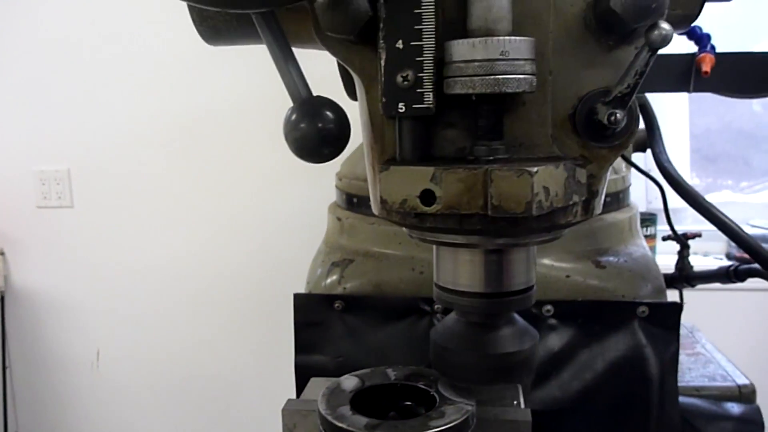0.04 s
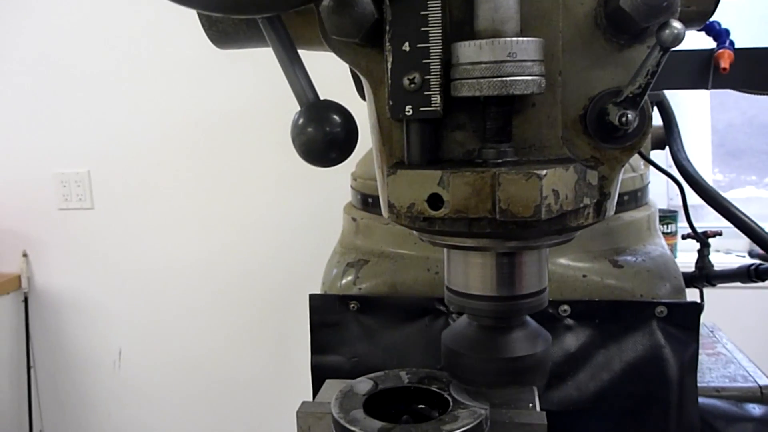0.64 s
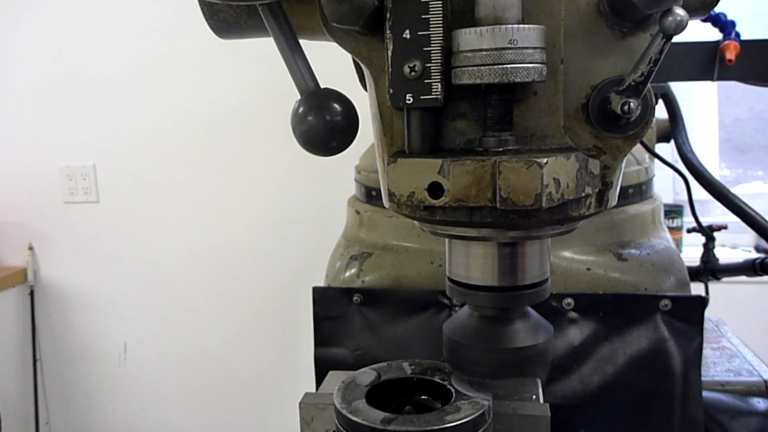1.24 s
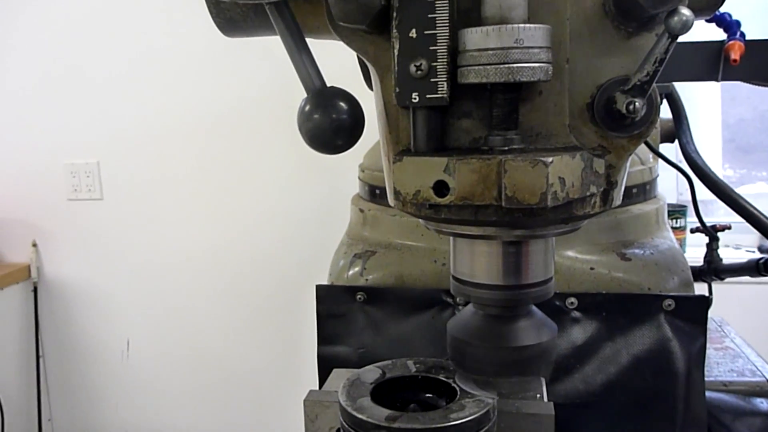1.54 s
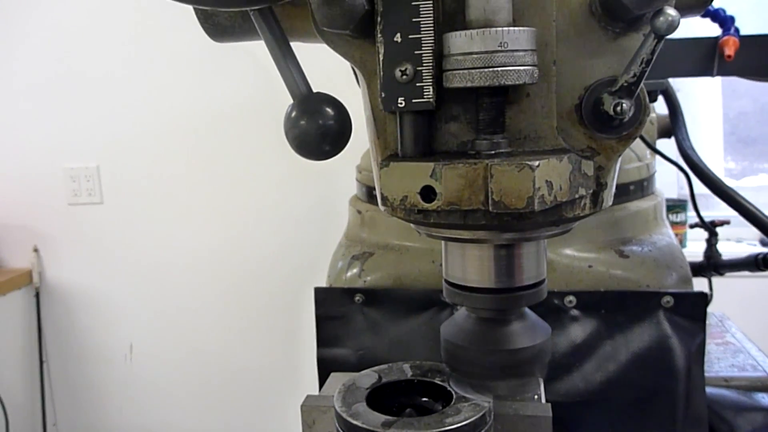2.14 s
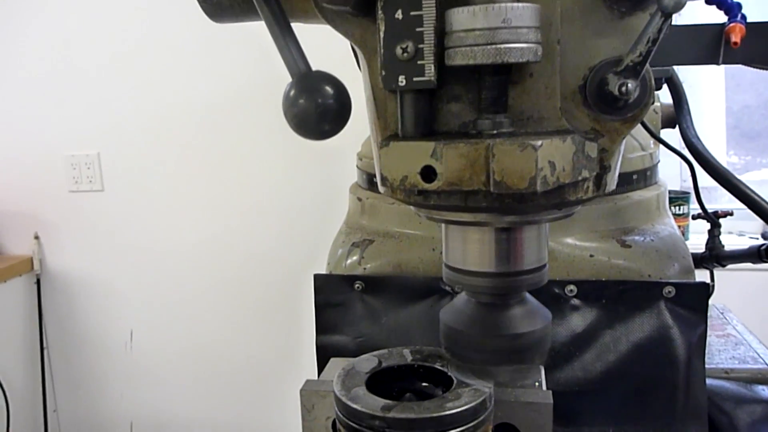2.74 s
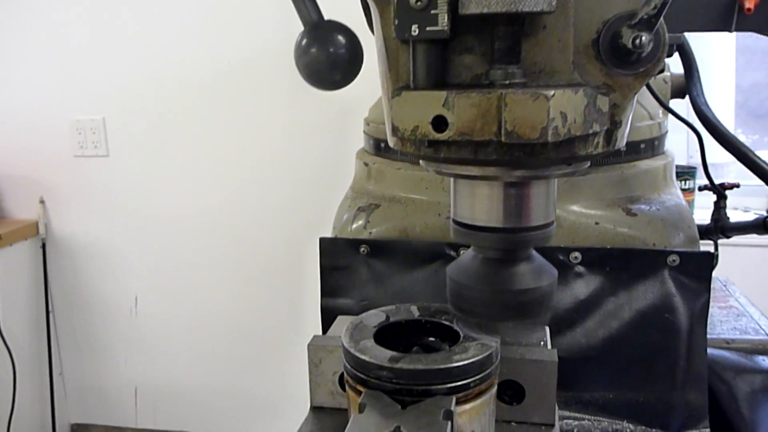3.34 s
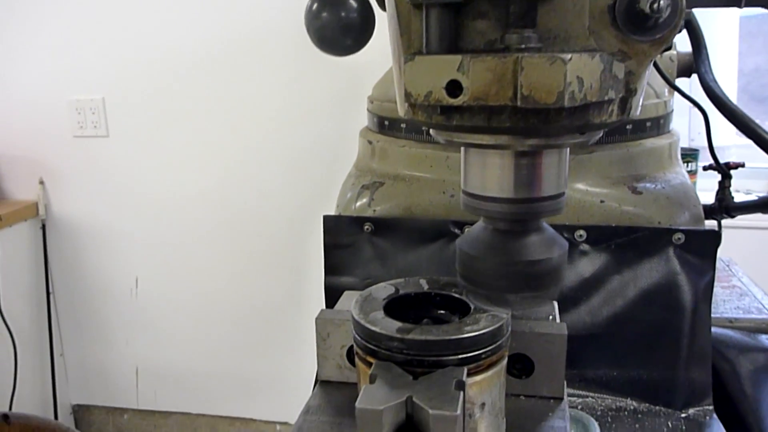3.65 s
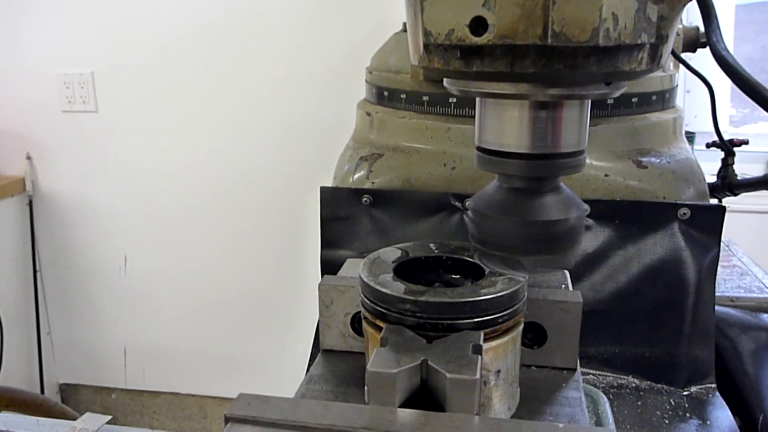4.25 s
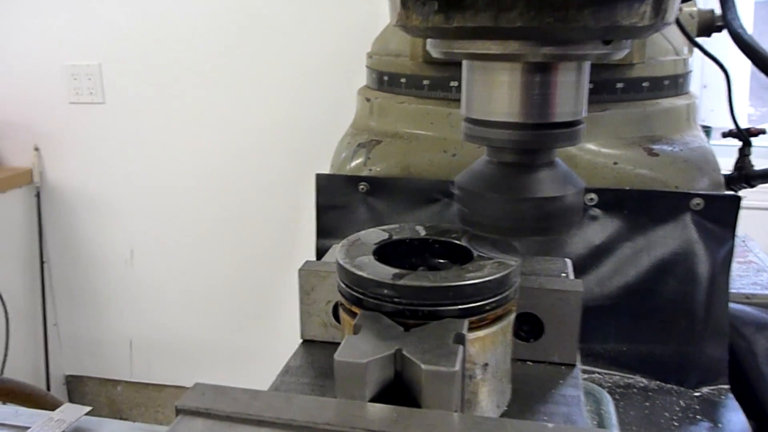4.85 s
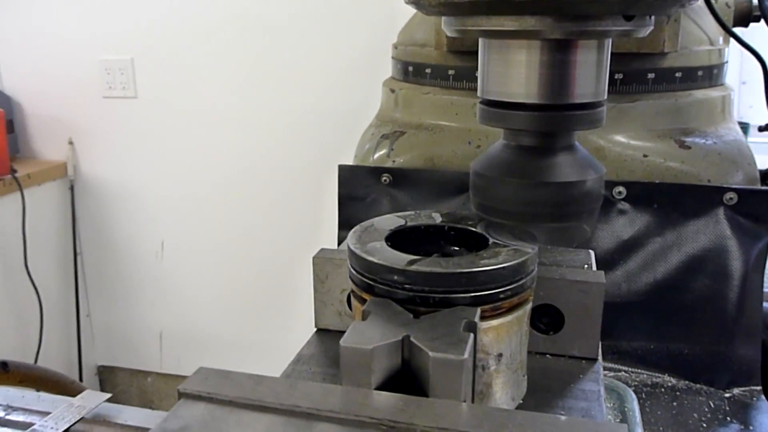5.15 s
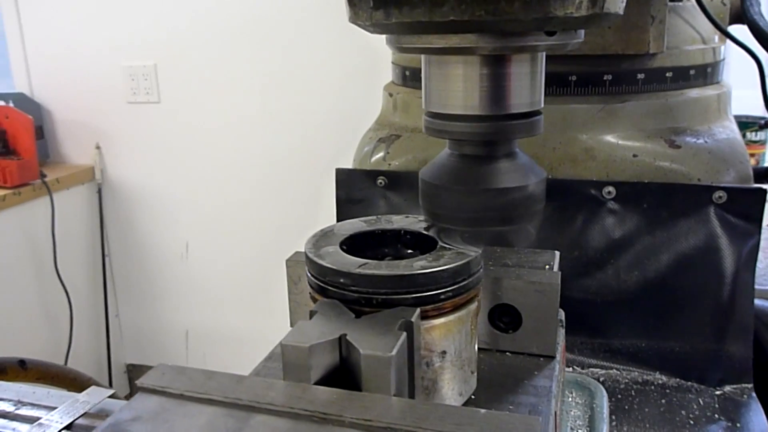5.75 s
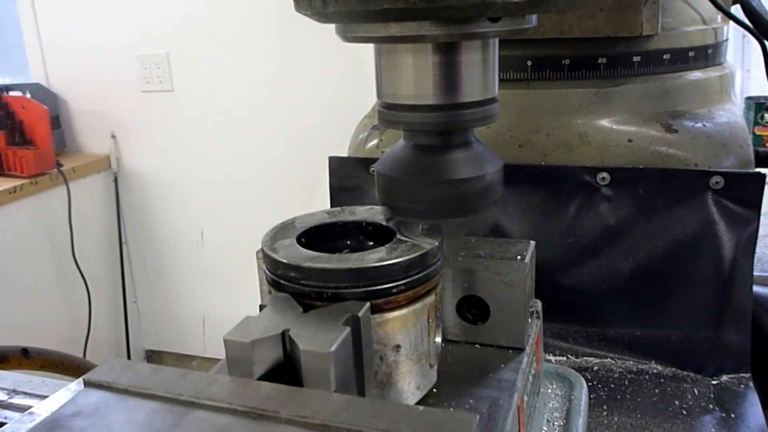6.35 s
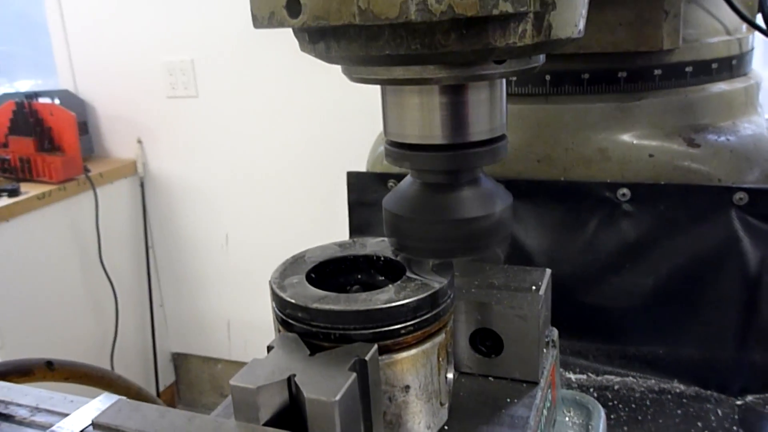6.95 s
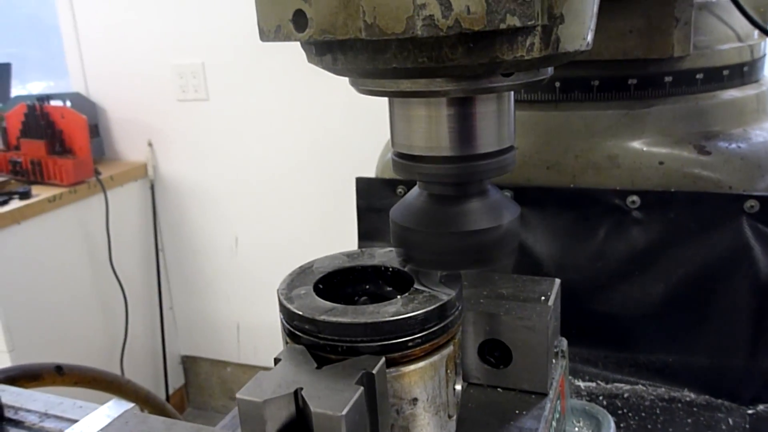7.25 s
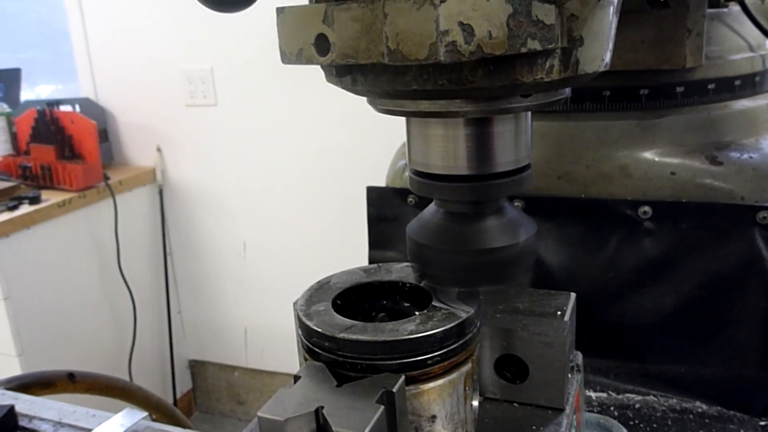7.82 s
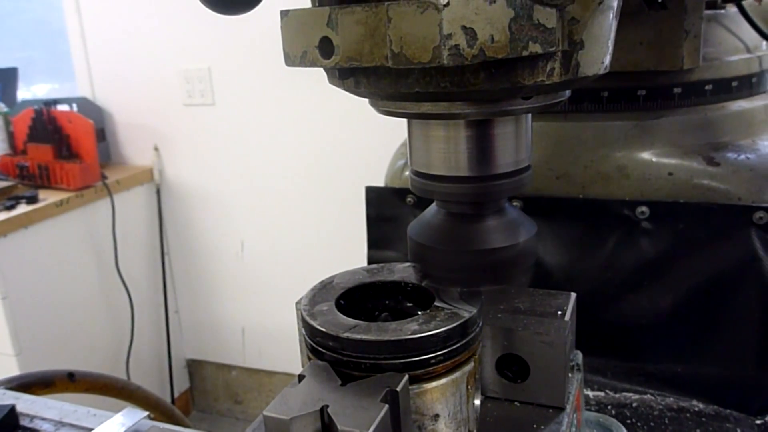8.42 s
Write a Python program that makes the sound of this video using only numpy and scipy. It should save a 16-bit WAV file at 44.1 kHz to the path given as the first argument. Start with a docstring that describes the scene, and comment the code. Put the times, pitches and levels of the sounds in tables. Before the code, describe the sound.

Steady gear drone and fast rattling as a milling cutter scrapes metal in a small workshop, with a thin whine and a few sharp clicks.

```python
"""A small workshop, where a vertical milling machine runs a face mill over a piston.
The head's gears drone, sing and clatter in a pattern that comes round with the spindle. Once a turn
the cutter bites and tears off a chip, over a steady scrape and hiss. The motor's inverter whines near
4 kHz, and a few sharp metal clicks ring out early on. The balance shifts as a hand-held microphone
sinks from the head to the cutter."""
import sys
import numpy as np
from scipy import signal
from scipy.fft import rfft, irfft, next_fast_len
from scipy.io import wavfile
from scipy.ndimage import uniform_filter1d, minimum_filter1d, map_coordinates

SR = 44100
rng = np.random.default_rng(int(sys.argv[2]) if len(sys.argv) > 2 else 0)


def store_pcm(level_fs):
    """Save levels as 16-bit WAV."""
    pcm = np.round(np.clip(level_fs, -1, 1) * 32767).astype(np.int16)
    wavfile.write(sys.argv[1], SR, np.atleast_2d(pcm).T)


N = 382788

SPINDLE_HZ, CARRIER_HZ, SUPPLY_HZ = 27.68, 3999, 50.85
SINK_START_S, SINK_END_S = 2.25, 5.7  # the microphone moves from head to cutter
FADES_PER_S = 2.95  # tones swell and fade as it drifts through the room's standing waves
TIGHT_SPOT_TURNS, THUMP_HZ, THUMP_S = .25, 555, .0045  # the teeth bind hardest at this angle

# Reverberation of the room: frequency_hz, t60_s
ROOM_DECAY = [(200, 0.27), (2000, 0.21), (6000, 0.59), (12000, 0.15)]
# Contacts on a steel part and on a duller, heavier one: start_s, level_db, ring_gain_db, t60_ratio
STEEL_HITS = [(.1117, -10.5, 2, 1.07), (.4432, -17.5, 2.5, 0.93), (.4495, -25, 6, 1.1)]
DULL_HITS = [(.016, -25, -15, 0.5), (.089, -23, -13.5, 0.5), (1.9746, -14, 2, 1), (1.988, -23, -10, 1)]
# Modes of those two parts: pitch_hz, level_db, t60_s
STEEL_MODES = [(2107, -6.5, 0.032), (2170, -19, 0.23), (2690, -12, 0.021), (2940, -10, 0.027),
               (3290, -3.5, 0.033), (4560, -2.5, 0.028), (4680, -3.5, 0.03), (4603, -33, 0.75),
               (5080, -29, .12), (5940, -14.5, 0.06), (6160, -18, 0.11), (9560, -38, 0.45),
               (9650, -23, 0.08), (11660, -36, .25)]
DULL_MODES = [(1016, -24, 0.3), (1180, -26, 0.3), (1400, -13, 0.025), (2130, -17, 0.65), (2480, -10, 0.028),
              (2720, -7, 0.028), (3150, -16, 0.025), (5400, -16, 0.033), (6160, -10, 0.04)]
# Spectral envelopes of the noises: frequency_hz, relative_density_db
CRACK_SPECTRUM = [(60, -48), (150, -30), (400, -12), (800, 5.5), (2000, 4.5), (3200, 8.5), (5000, -13),
                  (6500, -3), (8000, -26.5), (10700, -23), (15000, -54)]
DRONE_SPECTRUM = [(25, -45), (70, -52), (110, -28), (150, -23), (205, -4.5), (270, -8), (330, -5.5),
                  (400, 2), (470, -2.5), (560, 4.5), (800, -39)]
CLATTER_SPECTRUM = [(300, -44), (440, -17), (520, -5.5), (630, -2), (710, -2.5), (860, -0.5), (1030, -1.5),
                    (1250, -1), (1450, 0), (1720, -3), (1850, -7), (2300, -5.5), (3200, -13), (5000, -54)]
SCRAPE_SPECTRUM = [(500, -53), (1500, 0.5), (1900, 3.5), (2150, -4), (2400, 0), (2630, 4.5), (2820, 3),
                   (2930, 7), (3150, -5.5), (3400, -2.5), (3630, -0.5), (4000, -9), (4400, -24),
                   (6000, -67.5)]
HISS_SPECTRUM = [(1500, -37), (3500, 1), (4250, 0), (4550, 1.5), (5000, 2.5), (6300, 0), (7000, -4.5),
                 (7500, -14.5), (7900, -31), (8400, -20.5), (9600, -19.5), (10700, -10.5), (12000, -20.5),
                 (13500, -24.5), (15000, -58)]
# Resonances of housing, dragging edge, tearing chip and cutter: pitch_hz, width_hz, relative_db
HOUSING_MODES = [(498, 28, -4.5), (632, 47, -1), (788, 54, -1.5), (877, 94, 0.5)]
RASP_MODES = [(3620, 58, -1.5), (3716, 63, -2), (3970, 110, -3)]
CHIP_MODES = [(1390, 130, -4.5), (1593, 95, -0.5), (1725, 62, -1.5), (1895, 67, -2.5)]
CUTTER_MODES = [(2365, 72, -9), (2608, 59, 7), (2932, 43, -1), (3740, 290, -8)]
# Strong outer sidebands of the inverter: time_s, lower_db, upper_db
SIDEBAND_LEVELS = [(0.5, -42.5, -51), (1.8, -39, -49), (2.45, -39.5, -49), (3.05, -38.5, -51),
                   (3.65, -44.5, -46.5), (4.5, -41.5, -48.5), (5.6, -43, -51), (6.2, -41, -39),
                   (6.9, -41.5, -41), (7.7, -44, -40.5), (8.68, -42.5, -44.5)]
# Gear tones, on the nearest whole order: cycles_per_turn, idle_db, near_gain_db, gain_per_surge_db
GEAR_ORDERS = [(10, -65.5, -2.5, 4.5), (14.2, -51.5, -1, -1.5), (18.8, -65, 3, -4), (22, -69, -7, -2),
               (23.8, -63, 13, 2), (35.4, -58.5, 8.5, 6.5), (41.6, -58.5, 4, 8), (62, -56, 3, 8)]
# Gear tones that vary most as the microphone moves: time_s, then level_db for each swelling order
SWELL_LEVELS = [(0.2, -64.5, -59, -79, -48, -45), (0.9, -65, -60, -80, -52, -41),
                (2.3, -63.5, -57.5, -66, -55, -45.5), (3.3, -66, -63, -54, -52, -43),
                (4.0, -63.5, -56.5, -60, -52, -45), (4.6, -67, -56.5, -56, -46, -57),
                (5.35, -60.5, -55, -58, -53, -55), (6.2, -67, -50.5, -61, -44, -62),
                (7.051, -66.5, -51.5, -55, -37, -54), (7.7, -70.5, -52, -56, -49, -56),
                (8.2, -67, -54, -63, -45, -54), (8.68, -71, -53.5, -52, -41, -47)]
SWELLING_ORDERS = (6, 11, 20, 30, 31)
# How loud and throbbing the machine is, a brief loud start, then swells with the cut: time_s, surge_ratio
SURGE = [(0, 1.38), (0.3, 0.32), (1.35, 0.61), (2.4, 0.4), (3.2, 0.58), (4.4, 0.8), (5.55, 0.37),
         (7.1, 0.81), (7.8, 0.79), (8.68, 0.48)]
# Lag behind an even speed as the cut drags on the spindle: time_s, lag_turns
LAG_TURNS = [(0, -.035), (3.3, 0), (4.8, .04), (5.7, .005), (8.68, -.035)]
# Slow envelopes of thump, rasp and chip growl: time_s, level_db
THUMP_ENVELOPE = [(0, -43), (0.6, -43.5), (2.3, -43), (3.3, -39), (4.6, -41.5), (5.6, -43), (7.2, -41.5),
                  (8.68, -43.5)]
RASP_ENVELOPE = [(0, -65), (3.4, -43.5), (4.2, -43), (4.95, -41), (5.7, -49.5), (6.8, -41), (7.8, -47),
                 (8.4, -40)]
CHIP_ENVELOPE = [(0, -60), (1.4, -41.5), (2.4, -48), (3.2, -39), (4.3, -39), (5.5, -52), (7.3, -41),
                 (8.68, -45)]


def amp(db):
    """Amplitude grows tenfold every 20 dB."""
    return np.exp(np.asarray(db) * (np.log(10) / 20))


def unit(x):
    """Normalisation to rms 1."""
    return x / np.sqrt(np.mean(x ** 2) + 1e-20)


def along(points, hz):
    """Interpolation on a logarithmic frequency axis."""
    known_hz, values = np.transpose(points)
    return np.interp(np.log(hz + 1), np.log(known_hz + 1), values)


def seconds():
    """Uniform sampling: the time of every sample."""
    return np.arange(N) / SR


def curves(rows):
    """Linear interpolation in time: one curve for each column after the first."""
    time_s, *columns = np.transpose(rows)
    return [np.interp(seconds(), time_s, column) for column in columns]


def wobble(rate):
    """Smooth random modulation: a spline through rate Gaussian knots a second."""
    knots = rng.standard_normal(int(N * rate / SR) + 4)
    coarse = np.arange(0, N, 32)
    return np.interp(np.arange(N), coarse, map_coordinates(knots, [coarse * rate / SR]))


def filtered(x, response):
    """Linear filtering multiplies the spectrum by a frequency response."""
    size = next_fast_len(len(x) + SR // 4)
    return irfft(rfft(x, size) * response(np.fft.rfftfreq(size, 1 / SR)), size)[:len(x)]


def coloured(x, spectrum):
    """Source and filter: x shaped by a spectral envelope, at rms 1."""
    return unit(filtered(x, lambda hz: amp(along(spectrum, hz))))


def shaken(force, modes):
    """Forced vibration: a sum of steep-skirted resonances answers the force, at rms 1."""
    peak = lambda f, hz, width: (1j * f * width / (hz * hz - f * f + 1j * f * width)) ** 2
    response = lambda f: sum(amp(db) * peak(f, hz, 2 * width) for hz, width, db in modes)
    return unit(filtered(force, response))


def level(idle_db, near_db, surge_db):
    """Gains add in decibels: the idle level, near_db down at the cutter, surge_db per unit of surge."""
    nearness = np.clip((seconds() - SINK_START_S) / (SINK_END_S - SINK_START_S), 0, 1)
    return amp(idle_db + near_db * nearness + surge_db * curves(SURGE)[0])


def roughness(cycles, count=5, size=4096):
    """Periodic roughness, drifting through count shapes as the listening angle changes."""
    shapes = irfft(np.exp(2j * np.pi * rng.random((count, size // 8))), size)
    spot = (cycles * size).astype(int) % size
    drift = np.linspace(0, count - 1, N, endpoint=False)
    k = drift.astype(int)
    return unit(np.sqrt(k + 1 - drift) * shapes[k, spot] + np.sqrt(drift - k) * shapes[k + 1, spot])


def rubbing(turns, spindle_db, half_speed_db):
    """Friction: wear patterns repeat with the spindle and a half-speed shaft, over noise at 0 dB."""
    worn = amp(spindle_db) * roughness(turns) + amp(half_speed_db) * roughness(turns / 2)
    return worn + rng.standard_normal(N)


def turn_pulses(turns, start_turns, sharpness, scatter_db):
    """Periodic forcing: a pulse rises and dies once a turn, each time at a new strength."""
    since = turns - start_turns + 1
    strength = amp(scatter_db * np.clip(rng.standard_normal(N // 1000), -1.5, 1.5))
    age = since % 1 * sharpness
    return strength[since.astype(int)] * age * np.exp(1 - age)


def reverberation(x):
    """Convolution with the room's diffuse tail, which lasts longest near 6 kHz."""
    hz, t, noise = signal.stft(rng.standard_normal(SR // 2), SR, nperseg=256)
    decay = amp(-60 * t / along(ROOM_DECAY, hz)[:, None])
    tail = signal.istft(noise * decay, SR, nperseg=256)[1]
    return signal.fftconvolve(x, np.pad(tail, (SR // 200, 0)) / np.linalg.norm(tail))[:N]


def clicks(hits, modes, crack_db, crack_t60_s):
    """Free vibration after impact: a short crack, then damped modes that beat as they fade."""
    ringing, cracks = np.zeros((2, N + SR))
    t = np.arange(SR // 2) / SR
    attack = 1 - np.exp(-(t / 0.00023) ** 2)

    def beating(hz):
        tone = np.sin(2 * np.pi * (hz * t + rng.random()))
        return tone * (1 + 0.48 * np.sin(2 * np.pi * (rng.uniform(20, 39) * t + rng.random())))

    for start_s, db, ring_db, t60_ratio in hits:
        ring = sum(amp(mode_db + rng.normal(0, 1) - 60 * t / (t60_ratio * t60_s)) * beating(hz)
                   for hz, mode_db, t60_s in modes)
        crack = amp(crack_db - 60 * t / crack_t60_s) * rng.standard_normal(len(t))
        start = round(start_s * SR)
        ringing[start:][:len(t)] += amp(db + ring_db) * ring * attack
        cracks[start:][:len(t)] += amp(db) * crack
    return ringing[:N] + filtered(cracks[:N], lambda hz: amp(along(CRACK_SPECTRUM, hz)))


def inverter(inner_gain_db, overtone_db, fade_db):
    """Modulation: the windings sing in two sideband pairs of the carrier, and faintly near its octave."""
    tone = lambda hz: np.sqrt(2) * np.sin(2 * np.pi * hz * seconds() + 0.087 * wobble(11))
    sideband = lambda k, db: amp(db) * tone(CARRIER_HZ + k * SUPPLY_HZ)
    lower_db, upper_db = curves(SIDEBAND_LEVELS)
    outer = sideband(-3, lower_db) + sideband(3, upper_db)
    inner = sum(sideband(k, db + inner_gain_db + fade_db * wobble(FADES_PER_S))
                for k, db in ((-1, lower_db), (0.99, upper_db)))
    return outer + inner + amp(overtone_db) * tone(2 * (CARRIER_HZ + SUPPLY_HZ))


def gear_tones(turns, fade_db, flutter_db):
    """Tooth meshing sounds spindle harmonics; those near the thump's pitch add in phase with it."""
    since = turns - TIGHT_SPOT_TURNS

    def tone(order):
        flutter = amp(flutter_db * wobble(16))
        offset_cycles = .02 * (order - THUMP_HZ / SPINDLE_HZ) * rng.standard_normal()
        phase = 2 * np.pi * (round(order) * since + offset_cycles) + 0.48 * wobble(12)
        return np.sqrt(2) * flutter * np.sin(phase)

    meshing = sum(level(idle_db, near_db, surge_db) * amp(fade_db * wobble(FADES_PER_S)) * tone(order)
                  for order, idle_db, near_db, surge_db in GEAR_ORDERS)
    swelling = sum(amp(db) * tone(order) for order, db in zip(SWELLING_ORDERS, curves(SWELL_LEVELS)))
    return meshing + swelling


def thump(turns, scatter_db):
    """A Gaussian tone burst: the housing thumps as the teeth bind at each turn's tight spot."""
    offset_s = ((turns - TIGHT_SPOT_TURNS + .5) % 1 - .5) / SPINDLE_HZ
    phase = 2 * np.pi * THUMP_HZ * offset_s + 0.34 * wobble(SPINDLE_HZ)
    burst = np.exp(-(offset_s / THUMP_S) ** 2) * np.sin(phase)
    return amp(curves(THUMP_ENVELOPE)[0]) * unit(burst * amp(scatter_db * wobble(SPINDLE_HZ)))


def head_drive(turns, throb, rattle, sway):
    """Structure-borne sound: worn surfaces drone, clatter and shake the housing, throbbing each turn."""
    teeth = rubbing(turns, spindle_db=-5.5, half_speed_db=-10)
    rumble = rubbing(turns, spindle_db=-3.5, half_speed_db=-4)
    shaking = rubbing(turns, spindle_db=-12.5, half_speed_db=-8.5)
    drone = coloured(rumble * (1 + 0.15 * throb), DRONE_SPECTRUM)
    housing = shaken(shaking * (1 + 0.48 * throb), HOUSING_MODES)
    clatter = coloured(teeth * (1 + .5 * throb) * amp(0.57 * rattle + 0.4 * sway), CLATTER_SPECTRUM)
    return (level(idle_db=-50.5, near_db=3.9, surge_db=3.3) * drone
            + level(idle_db=-44.5, near_db=1.1, surge_db=3.6) * housing
            + level(idle_db=-35.5, near_db=2.43, surge_db=3.55) * clatter)


def cutting_friction(turns, throb, rattle, sway):
    """Friction noise: the cutter scrapes and hisses, amplitude-modulated by throb and rattle."""
    contact = rubbing(turns, spindle_db=-3, half_speed_db=-7.5) * (1 + 0.055 * throb)
    scrape = coloured(contact * amp(0.5 * rattle + 0.21 * sway), SCRAPE_SPECTRUM)
    noise = rng.standard_normal(N) * (1 + 0.22 * throb)
    hiss = coloured(noise * amp(0.35 * rattle + 0.19 * wobble(30)), HISS_SPECTRUM)
    return (level(idle_db=-41, near_db=0.76, surge_db=3.1) * scrape
            + level(idle_db=-41, near_db=2.27, surge_db=1.7) * hiss)


def edge_rasp(turns, steady_drag):
    """Friction excites narrow resonances as the edge drags over the piston, hardest once a turn."""
    drag = steady_drag + turn_pulses(turns, start_turns=0.14, sharpness=5, scatter_db=-0.5)
    return amp(curves(RASP_ENVELOPE)[0]) * shaken(drag * rng.standard_normal(N), RASP_MODES)


def chip_growl(turns):
    """Resonances under uneven forcing: the chip tears off with a rough growl after each bite."""
    pull = turn_pulses(turns, start_turns=.27, sharpness=8, scatter_db=2.5)
    tearing = pull * amp(3 * np.clip(wobble(350), -2, 2))
    force = tearing * rubbing(turns, spindle_db=-3.5, half_speed_db=-7.5)
    return amp(curves(CHIP_ENVELOPE)[0]) * shaken(force, CHIP_MODES)


def cutter_bites(turns, start_turns, scatter_s, scatter_db, crunch_db):
    """Impulse excitation: one strike a turn and the crunch of breaking chip ring the cutter's modes."""
    each_turn = np.arange(int(turns[-1]))
    timing, strength = np.clip(rng.standard_normal((len(each_turn), 2)), -2, 2).T
    strike_s = np.interp(each_turn + start_turns, turns, seconds()) + scatter_s * timing
    strikes = np.bincount(np.clip(strike_s * SR, 0, N - 1).astype(int), amp(scatter_db * strength), N)
    crunch = turn_pulses(turns, start_turns, sharpness=21, scatter_db=2) * rng.standard_normal(N)
    force = unit(strikes) + amp(crunch_db) * unit(crunch)
    return level(idle_db=-47.5, near_db=4.3, surge_db=2.5) * shaken(force, CUTTER_MODES)


def scene():
    """Superposition: clicks and their reverberation, the whine, and drive and cut locked to the spindle."""
    turns = SPINDLE_HZ * seconds() - curves(LAG_TURNS)[0]
    turns += .004 * wobble(0.98) + 0.0013 * wobble(14)  # the belt lets the speed waver
    metal = clicks(STEEL_HITS, STEEL_MODES, crack_db=2, crack_t60_s=0.032)
    metal += clicks(DULL_HITS, DULL_MODES, crack_db=5.5, crack_t60_s=0.015)
    whine = inverter(inner_gain_db=-13.5, overtone_db=-84, fade_db=1.5)
    echo = amp(-12.5) * reverberation(metal)
    peaks = turn_pulses(turns, start_turns=0.32, sharpness=10.7, scatter_db=7)
    throb = 0.49 * curves(SURGE)[0] * peaks
    rattle = np.clip(wobble(170), -2, 2)  # backlash lets the teeth rattle
    sway = wobble(22)  # a slower flicker in level
    drive = head_drive(turns, throb, rattle, sway)
    cut = cutting_friction(turns, throb, rattle, sway)
    drive += gear_tones(turns, fade_db=2.5, flutter_db=2.2) + thump(turns, scatter_db=1.5)
    cut += cutter_bites(turns, start_turns=.195, scatter_s=.0005, scatter_db=2, crunch_db=-9)
    cut += chip_growl(turns) + edge_rasp(turns, steady_drag=0.62)
    return (echo + metal + whine + drive + cut)[None]


def record(dry):
    """Peak and band limiting: the gain ducks smoothly around peaks, then the top treble is cut."""
    ceiling, window_samples, top_hz = .86, 64, 15200
    needed = np.minimum(1, ceiling / (np.abs(dry[0]) + 1e-9))
    gain = uniform_filter1d(minimum_filter1d(needed, 2 * window_samples + 1), window_samples)
    return filtered(dry[0] * gain, lambda hz: hz < top_hz)[None]


dry = scene()
out = record(dry)
store_pcm(out)
```